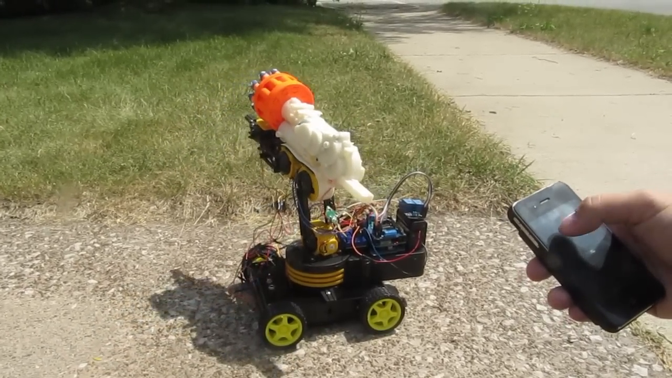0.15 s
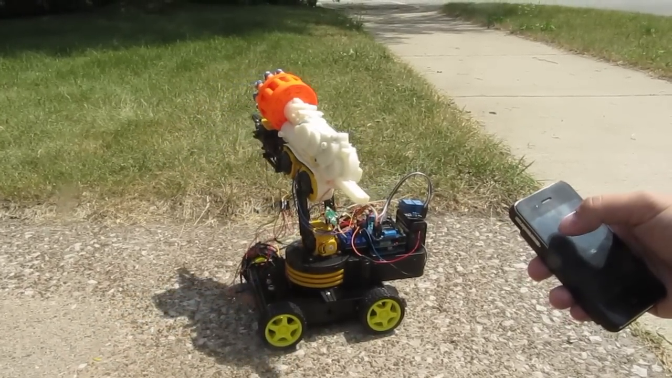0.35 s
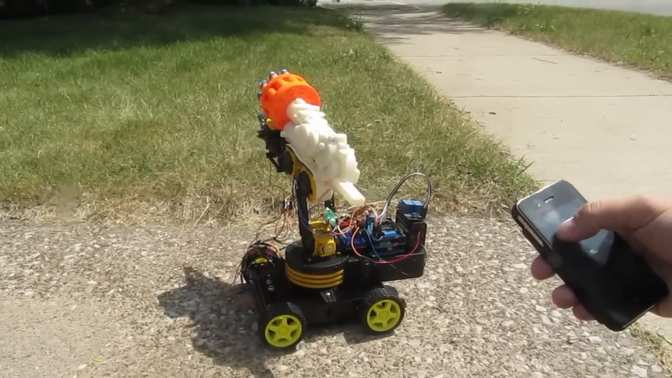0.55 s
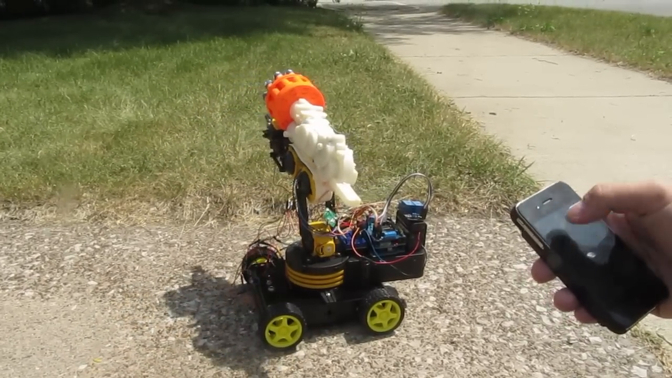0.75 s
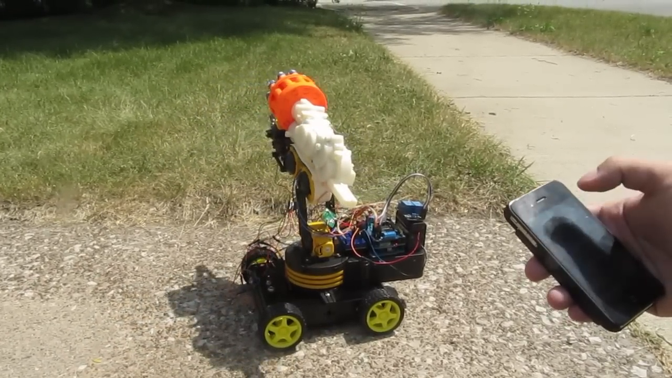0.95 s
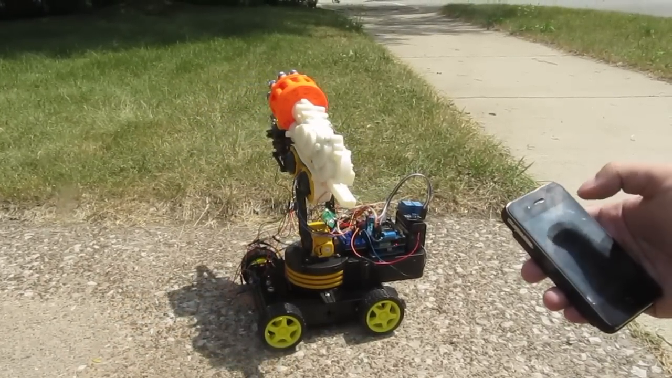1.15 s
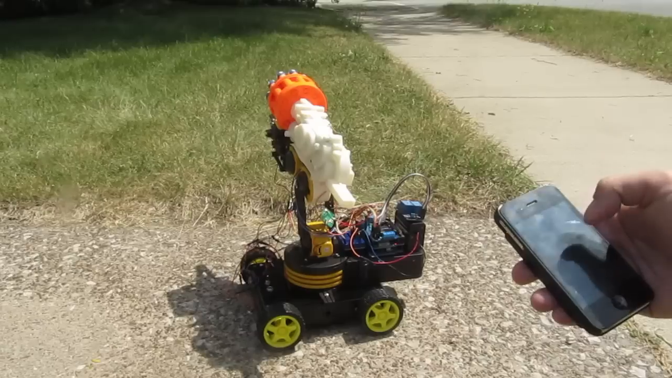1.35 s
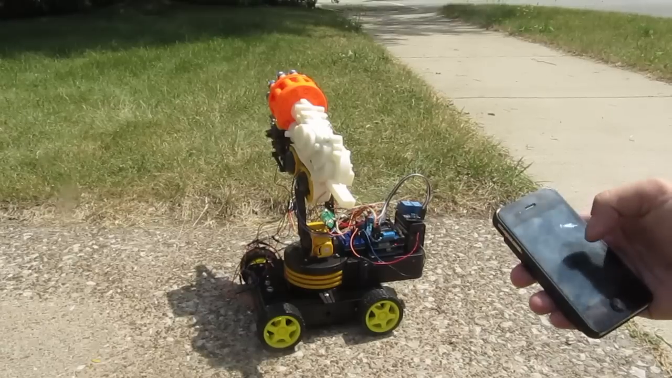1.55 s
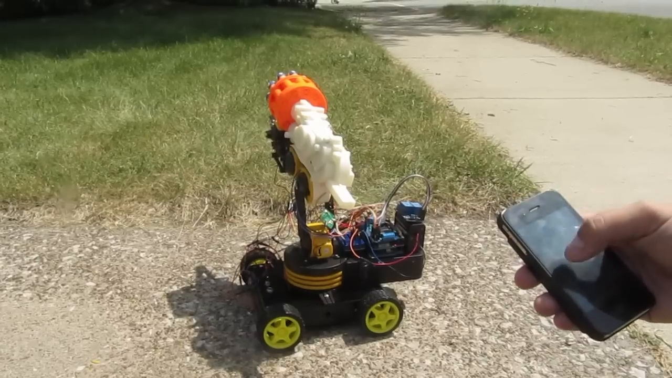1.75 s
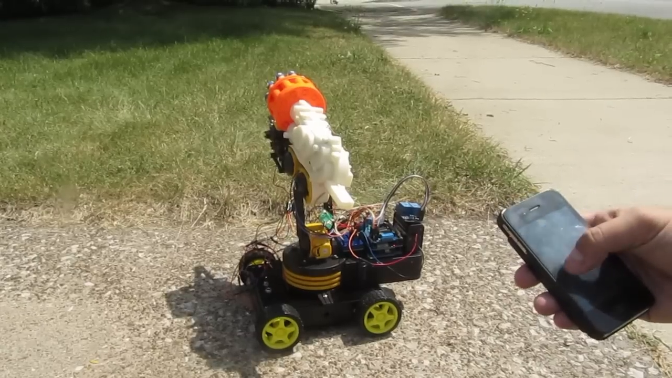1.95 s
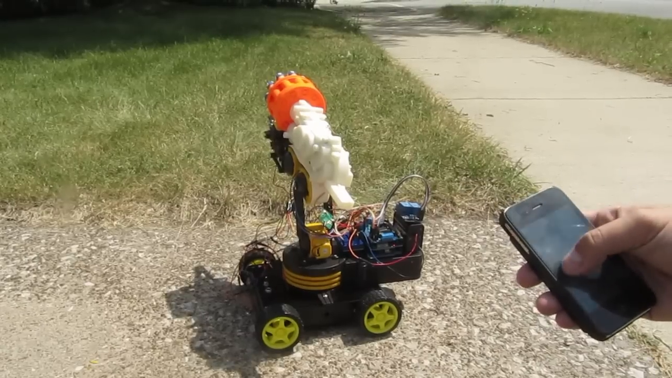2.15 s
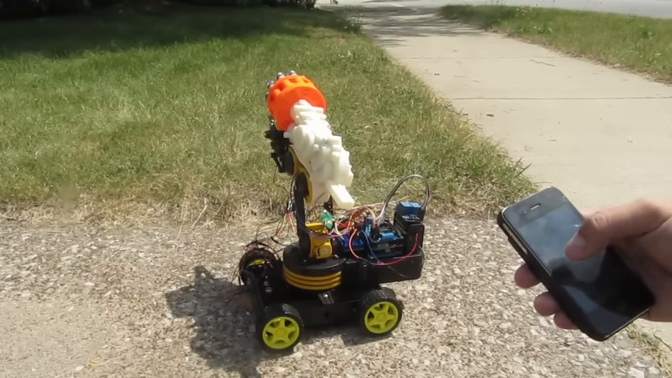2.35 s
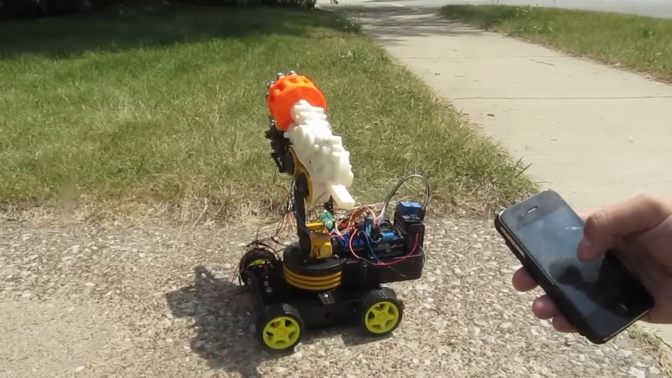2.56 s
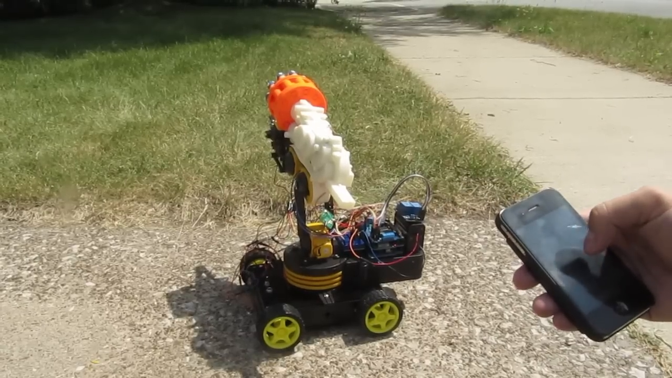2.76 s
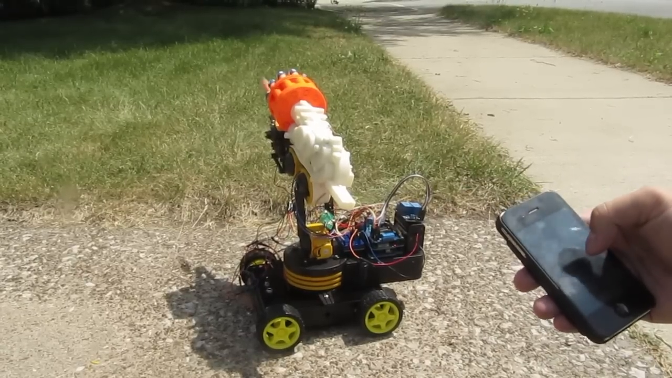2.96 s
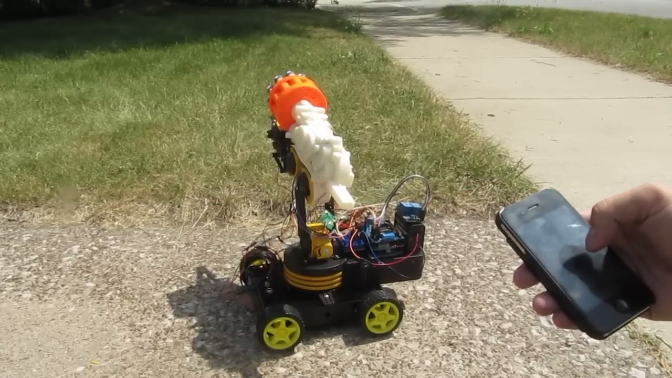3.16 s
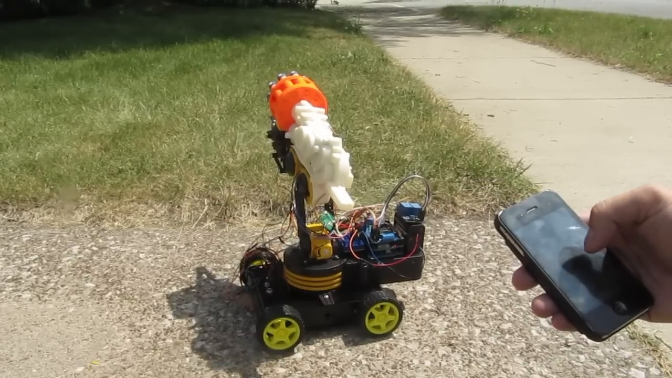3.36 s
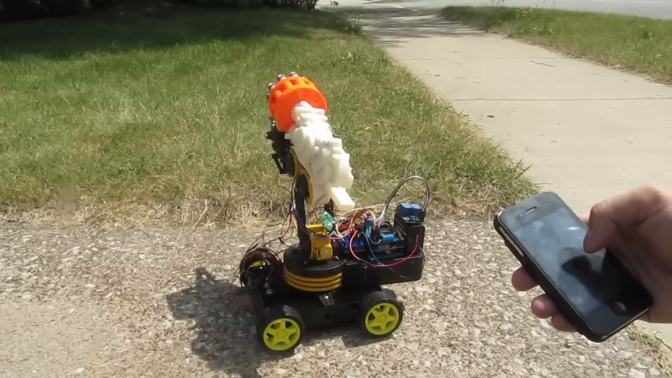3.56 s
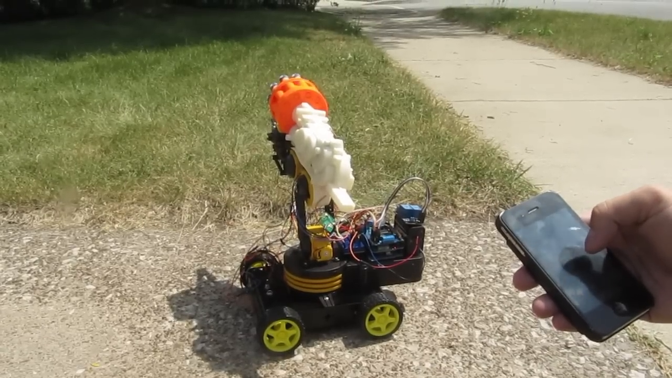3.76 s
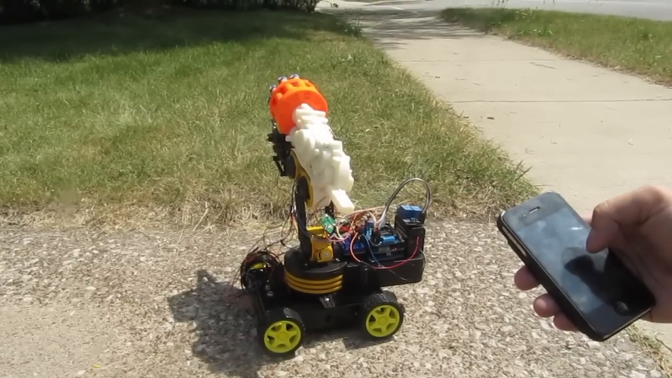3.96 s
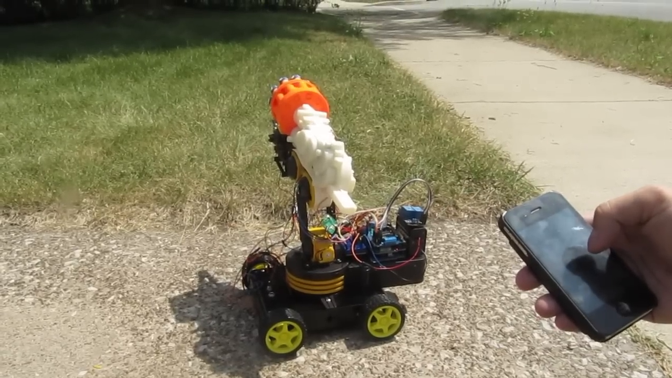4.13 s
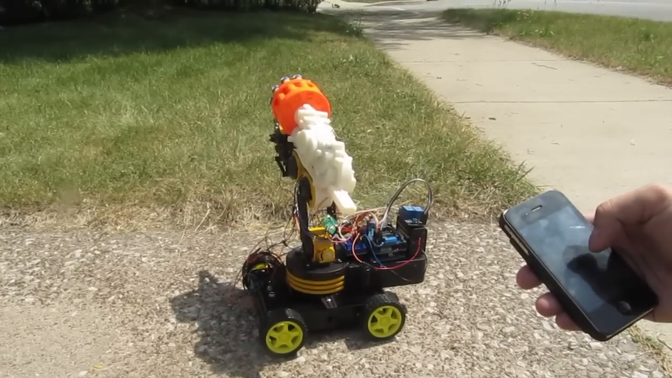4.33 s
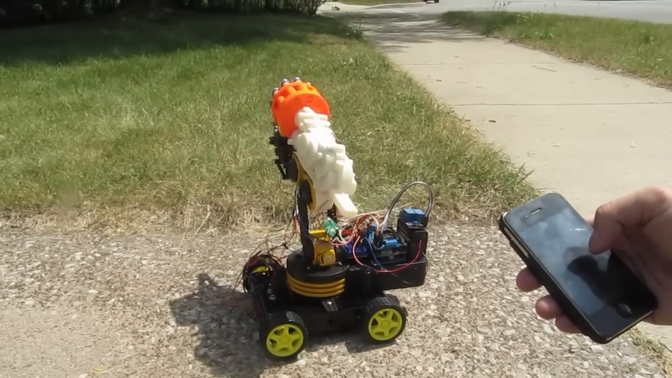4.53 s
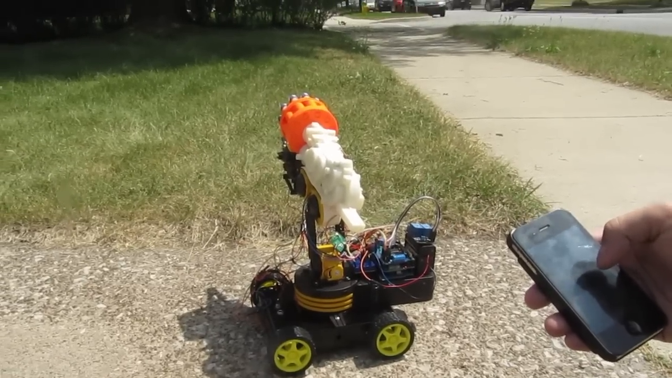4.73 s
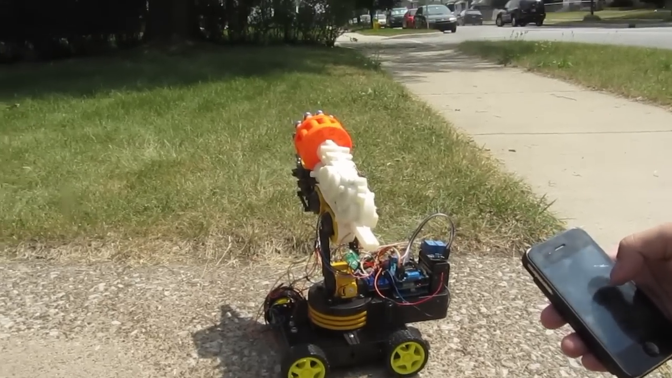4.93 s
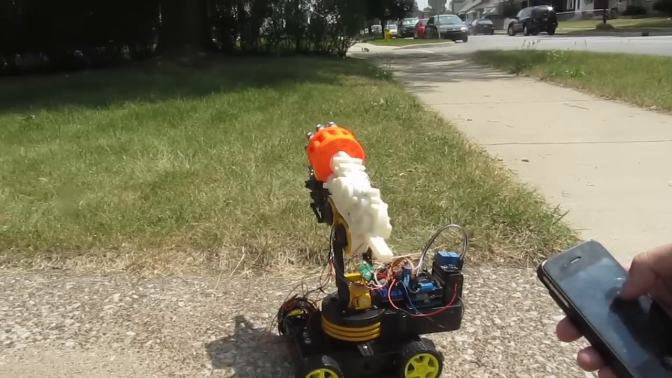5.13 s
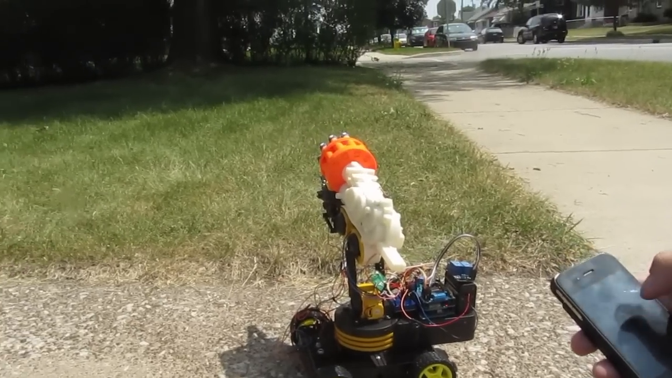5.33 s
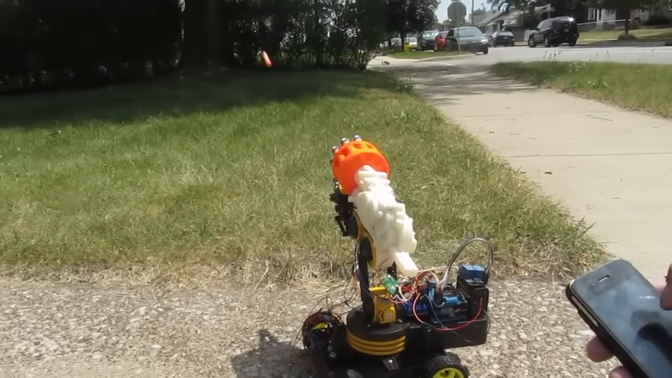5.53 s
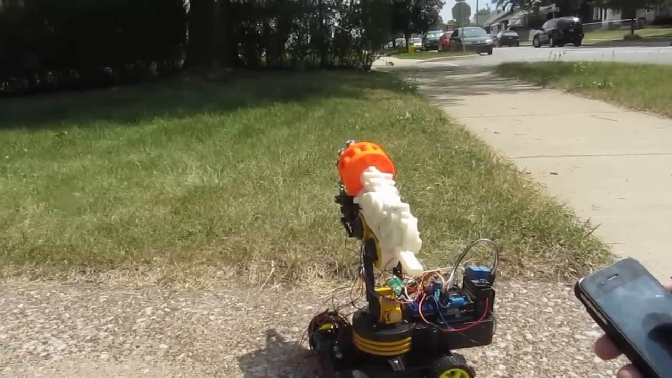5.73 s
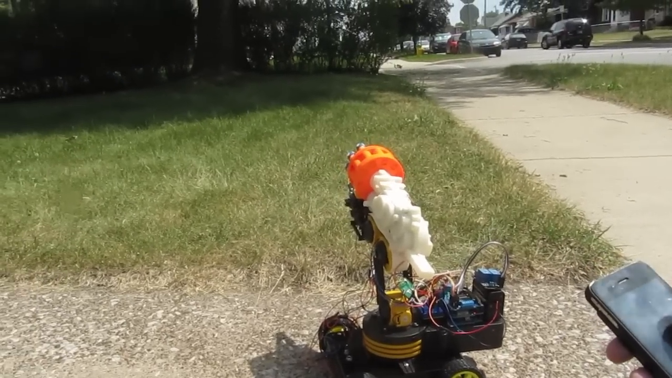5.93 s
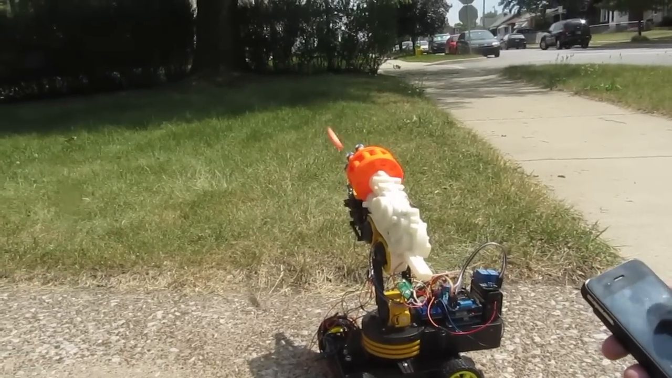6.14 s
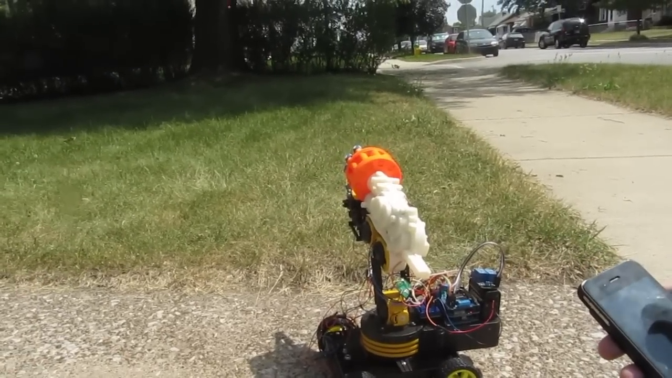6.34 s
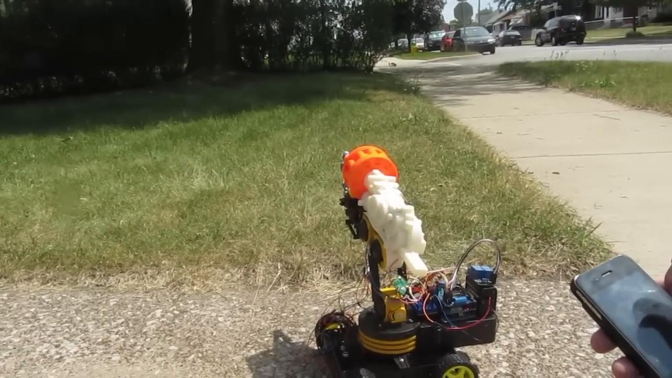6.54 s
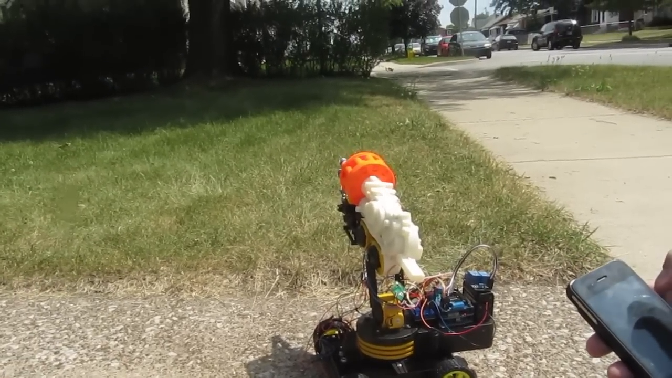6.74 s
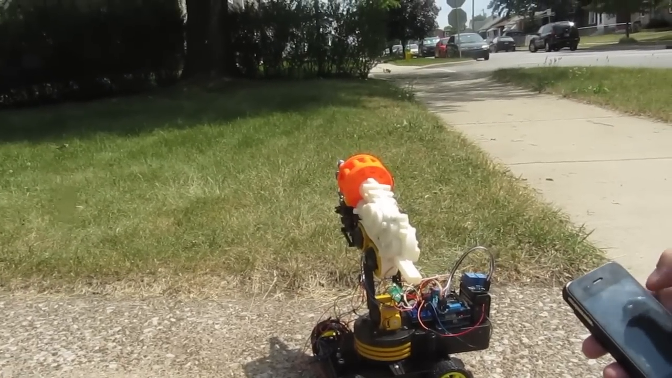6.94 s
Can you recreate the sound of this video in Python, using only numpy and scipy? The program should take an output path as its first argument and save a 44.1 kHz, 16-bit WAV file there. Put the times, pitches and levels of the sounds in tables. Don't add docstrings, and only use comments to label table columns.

```python
import sys
import numpy as np
from scipy import signal
from scipy.fft import rfft, irfft, next_fast_len
from scipy.io import wavfile
from scipy.ndimage import uniform_filter1d

SR = 44100
rng = np.random.default_rng(int(sys.argv[2]) if len(sys.argv) > 2 else 0)


def linear_from_db(decibels):
    return 10 ** (np.asarray(decibels, float) / 20)


def store_wav(level_fs):
    pcm = np.round(np.clip(np.atleast_2d(level_fs), -1, 1) * 32767)
    wavfile.write(sys.argv[1], SR, pcm.T.astype(np.int16))


N = 308259
T = np.arange(N) / SR
POWER_OFF_S = 6.14


def in_time(rows):
    s, *columns = np.transpose(rows)
    return [np.interp(T, s, c) for c in columns]


def at_hz(points, hz):
    table_hz, db = np.transpose(points)
    return np.interp(np.log(hz + 1), np.log(table_hz), db)


def resonance_db(modes, hz):
    return sum(top_db / (1 + ((hz - mode_hz) / width_hz) ** 2) for mode_hz, width_hz, top_db in modes)


def filtered(x, order, hz, kind):
    return signal.sosfilt(signal.butter(order, hz, kind, fs=SR, output="sos"), x)


def gate(start_s, end_s):
    return np.clip(np.minimum(T - start_s, end_s - T) / .005, 0, 1)


def drift(rate_hz, size=N):
    return np.interp(T[:size] * rate_hz, np.arange(400), rng.standard_normal(400)) * 1.22


def colour(x, spectrum):
    size = next_fast_len(N)
    hz = np.arange(size // 2 + 1) * SR / size
    y = irfft(rfft(x, size) * linear_from_db(at_hz(spectrum, hz)), size)[:N]
    return y / np.std(y)


def dying(start_s, t60_s, rise_s):
    age_s = np.maximum(T - start_s, 0)
    return np.minimum(age_s / rise_s, 1) * linear_from_db(-60 * age_s / t60_s)


def gritty(spread_db):
    size = np.repeat(rng.standard_normal(N // 24 + 1), 24)[:N]
    return rng.standard_normal(N) * linear_from_db(spread_db * size)


def each_turn(rows, until_s=POWER_OFF_S + .045):
    return [(shot[0] + s, *values) for shot in SHOTS[:-1] for s, *values in rows if shot[0] + s < until_s]


# (time [s], gear speed [turns/s])
SPIN_SPEED = [(2.47, 25), (2.5, 41.8), (2.55, 72.6), (2.58, 94), (2.63, 112.8), (2.7, 131), (2.77, 141.5),
              (2.84, 146), (2.92, 146), (3.03, 143.2)]
# (time after release [s], gear speed [turns/s])
CAM_SPEED = [(.09, 163), (.125, 167.8), (.2, 169.8), (.25, 167.5), (.31, 162.5), (.408, 150.2), (.575, 144),
             (.62, 143.2)]
# (time [s], gear speed [turns/s])
COAST_SPEED = [(6.17, 128.1), (6.42, 90), (6.5, 76), (6.56, 65), (6.65, 43.5), (6.71, 28.5), (6.76, 16),
               (6.82, 5)]
# (time [s], mesh line [dB], double mesh line [dB])
SPIN_LOAD = [(2.47, -63, -47), (2.52, -28, -48), (2.56, -24, -40), (2.6, -25, -38), (2.64, -38, -28.5),
             (2.75, -27, -34), (2.79, -28.5, -23), (3.03, -29, -22.5)]
# (time from release [s], mesh line [dB], double mesh line [dB])
CAM_LOAD = [(-.6, -100, -80), (-.36, -53, -49.5), (-.22, -45, -38), (-.1, -43.5, -34.5), (-.06, -44, -32),
            (-.01, -40.5, -35)]
# (time [s], mesh line [dB], double mesh line [dB])
COAST_LOAD = [(6.2, -72, -80), (6.48, -66, -75), (6.52, -45, -66), (6.59, -60, -60), (6.65, -46.5, -45),
              (6.69, -49, -58), (6.72, -60, -47), (6.76, -64, -54), (6.82, -66, -60)]
# (time [s], level [dB], treble [dB])
SPIN_GRIND = [(2.47, -17, -2), (2.476, -37, -2), (2.502, -26.5, -10), (2.58, -18, -3), (3.025, -13, 2)]
# (time after release [s], level [dB], treble [dB])
CAM_GRIND = [(.05, -17.5, 1.5), (.095, -23.5, -2.5), (.15, -11, 2), (.18, -20.5, -3), (.195, -12, 1.5),
             (.45, -15, 0.5), (.615, -16.5, 2)]
# (time [s], level [dB], treble [dB])
COAST_GRIND = [(6.245, -21, 2), (6.337, -23.5, -5), (6.421, -18, 1.5), (6.482, -30, -3),
               (6.489, -19.5, -0.5), (6.735, -26, -14), (6.775, -43, -6.5), (6.82, -66.5, 6)]
# (frequency [Hz], level [dB])
GRIND_BODY = [(290, -53), (500, -27.5), (670, -21), (822, -5), (1170, -5.5), (1410, -8.5), (1590, -4.5),
              (1870, -5.5), (2460, -1), (2810, -2.5), (4230, -1), (6560, -9.5), (7710, -3), (15600, -26),
              (16500, -63.5)]
# (frequency [Hz], width [Hz], lift [dB])
HOUSING = [(872, 63, 17), (1560, 78, 0.5), (2300, 94, 6), (2950, 40, -0.5), (4200, 180, 2.5)]
COMMUTATOR_DB = [-21.5, -16.5, -20, -15, -18]
SIDEBAND_DB = {1: [-6, 0, -4, -14], 2: [-12, 0, -4, -17], 3: [-40, -15, -40, -40]}
COMMUTATOR, MESH, OUTPUT, IDLER = 5, 24, 7.2, 26.4
BATTERY_SAG_PER_S = .7
COAST_DB, SLOW_RIPPLE_DB, SLOW_GROWL_DB = -5, -20, 10


def launcher_grit(turns, angle, level_db, treble_db):
    throb = 1 + 0.037 * np.cos(COMMUTATOR / 2 * angle)
    grit = colour(gritty(spread_db=2.0) * throb, GRIND_BODY)
    treble = filtered(grit, 2, 5500, "high")
    growl = filtered(grit, 2, [1400, 2600], "band")
    growl *= linear_from_db(SLOW_GROWL_DB * np.clip(1 - turns / 140, 0, 1)) - 1
    return linear_from_db(level_db - 2.0 + 0.65 * drift(40)) * (grit + (linear_from_db(treble_db) - 1) * treble + growl)


def launcher_lines(turns, level_db):
    before_release = [(shot[0] + s, *dbs) for shot in SHOTS[1:] for s, *dbs in CAM_LOAD]
    mesh_db, double_db = in_time(SPIN_LOAD + before_release + COAST_LOAD)
    cut_db = COAST_DB * gate(POWER_OFF_S, 9)
    drive_db = level_db + cut_db
    slow_db = SLOW_RIPPLE_DB * np.clip(1 - turns / 115, 0, 1)
    lines = [(COMMUTATOR * k, drive_db + db + slow_db / 2) for k, db in enumerate(COMMUTATOR_DB, 1)]
    lines += [(OUTPUT, double_db - 18), (IDLER, drive_db - 16.5)]
    for times, steps in SIDEBAND_DB.items():
        base_db = mesh_db if times == 1 else double_db
        for j, db in enumerate(steps, -1):
            side_db = base_db + db + (1 + abs(j)) * cut_db + abs(j) * slow_db
            lines.append((MESH * times + COMMUTATOR * j, side_db))
    return lines


def launcher():
    loaded = [(s, turns - BATTERY_SAG_PER_S * (s - SHOTS[0][0]))
              for s, turns in each_turn(CAM_SPEED, POWER_OFF_S)]
    turns, = in_time(SPIN_SPEED + loaded + COAST_SPEED)
    angle = 2 * np.pi * np.cumsum(turns) / SR
    level_db, treble_db = in_time(SPIN_GRIND + each_turn(CAM_GRIND) + COAST_GRIND)
    level_db = level_db + gain_db()
    out = launcher_grit(turns, angle, level_db, treble_db)
    for k, db in launcher_lines(turns, level_db):
        hz = k * turns
        bass_cut = 1 / (1 + (650 / hz) ** 8)
        rough_db = 1.5 if k == MESH or k > 40 else 3.2
        level = linear_from_db(db + resonance_db(HOUSING, hz) + rough_db * drift(25))
        out += bass_cut * level * np.sin(k * angle + min(.2 * rough_db, .45) * drift(55))
    return out * gate(SPIN_GRIND[0][0], COAST_GRIND[-1][0])


# (time [s], peak [dB], treble [dB], rebound delay [s], rebound [dB])
SHOTS = [
    (3.035, 4.5, -2, 0.012, -20),
    (3.663, 0, 1, 0.011, -6),
    (4.29, -2, 1, 0.009, -2.5),
    (4.922, 1, -1.5, 0.01, -7),
    (5.553, -1.5, -0.5, 0.0089, -2),
    (6.194, -1, 0.5, 0.0082, -2),
]
# (frequency [Hz], level [dB])
SHOT_BODY = [(59, -57.5), (100, -14.5), (589, -14.5), (1240, -7.5), (2080, -11.5), (2360, -5.5), (3120, -3),
             (3860, 3), (4780, -8.5), (5430, -2), (7330, -9), (10100, -4), (14500, -23), (15500, -24),
             (16500, -52)]
SHOT_T60_S, REBOUND_T60_S, RATTLE_T60_S = .06, .042, .25


def plunger():
    burst, out = colour(gritty(spread_db=2.5), SHOT_BODY), 0
    treble = filtered(burst, 2, 7000, "high")
    for s, peak_db, treble_db, delay_s, rebound_db in SHOTS:
        crack = dying(s, SHOT_T60_S, .002) + dying(s + .0013, .012, .0004)
        rebound = linear_from_db(rebound_db) * dying(s + delay_s, REBOUND_T60_S, 0.00035)
        rattle = linear_from_db(-29.5) * dying(s, RATTLE_T60_S, 0.0026)
        bright_burst = burst + (linear_from_db(treble_db + 5.0) - 1) * treble
        out = out + linear_from_db(peak_db - 13) * (crack + rebound + rattle) * bright_burst
    return out


# (time [s], level [dB], upper housing mode [dB], mode frequency [Hz])
ARM = [(0.0, -27, 3, 4100), (0.1, -27.5, 5.5, 4280), (0.27, -25.5, 5, 4000), (0.4, -25.5, 8, 4380),
       (0.576, -23.5, 3, 4100), (0.6, -27.5, 1, 4680), (0.9, -25.5, 3.5, 4650)]
# (time [s], level [dB])
ARM_COAST = [(0.94, -24.5), (1.0, -30.5), (1.08, -36), (1.17, -43), (1.25, -45), (1.33, -53), (1.45, -55)]
# (time [s], shaft speed [turns/s])
ARM_SPEED = [(0.0, 184.8), (0.16, 185.5), (0.24, 184.0), (0.37, 183.8), (0.64, 187.4), (0.92, 187.1)]
# (frequency [Hz], level [dB])
ARM_BODY = [(450, -26.5), (1950, -29.5), (2250, -17.5), (2550, -14.5), (3000, -5), (3550, 1), (3750, -10),
            (4350, -7.5), (5100, -12.5), (5900, -25.5), (6600, -13.5), (9000, -21), (12500, -29),
            (16000, -47)]
# (frequency [Hz], width [Hz], lift [dB])
ARM_MODES = [(6700, 420, -3.5), (9140, 270, 11), (11200, 200, 5)]
# (time [s], peak [dB], ring [Hz])
ARM_STOP = [(0.947, -19, 3520), (0.9756, -20.5, 3360), (1.041, -20, 3360), (1.082, -22.5, 3520),
            (1.1, -24, 3360), (1.1433, -39, 3500), (1.1733, -39, 4210), (1.2261, -37, 4080),
            (1.2386, -40, 4610), (1.293, -37, 3270)]
ARM_POLE_DB, ARM_MESH_DB, ARM_DRIFT_DB = 10, 6, 4
ARM_REPEAT = .8


def arm_lines(upper_db, upper_hz, size):
    turns = in_time(ARM_SPEED)[0][:size]
    angle, lines = 2 * np.pi * np.cumsum(turns) / SR, 0
    for k, start in enumerate(rng.normal(0, 1.4, 84), 1):
        hz = k * turns
        line_db = at_hz(ARM_BODY, hz) + ARM_POLE_DB * (k in (3, 6, 9)) + ARM_MESH_DB * (k in (12, 60))
        line_db += upper_db[:size] / (1 + ((hz - upper_hz[:size]) / 250) ** 2)
        line_db += resonance_db(ARM_MODES, hz)
        waver = drift(10, size=size) + .5 * drift(35, size=size)
        line_db += ARM_DRIFT_DB * min(k / 14, 1, 28 / k) * waver
        lines = lines + linear_from_db(line_db) * np.cos(k * angle + start + .5 * drift(13.9, size=size))
    return lines / np.sqrt(uniform_filter1d(lines ** 2, size=4000))


def arm():
    _, upper_db, upper_hz = in_time(ARM)
    level_db, = in_time([row[:2] for row in ARM] + ARM_COAST)
    repeat = ARM_REPEAT * gate(-1, .915)
    lumps = linear_from_db((1 + 2 * (T > .93)) * drift(55))
    out = np.sqrt(1 - repeat) * colour(gritty(spread_db=3.0), ARM_BODY) * lumps
    out[:SR] += np.sqrt(repeat[:SR]) * arm_lines(upper_db, upper_hz, SR)
    out *= linear_from_db(level_db) * gate(-1, ARM_COAST[-1][0])
    for s, peak_db, hz in ARM_STOP:
        ring = np.sin(2 * np.pi * hz * T + 1.1 * drift(53.3)) + 0.2 * np.sin(2 * np.pi * 2300 * T)
        out += linear_from_db(peak_db + 2.0) * dying(s, 0.033, 0.00097) * ring
    return out


# (time [s], peak [dB], ring [Hz], broad part [dB])
TICKS = [
    (1.8632, -43, 8600, -7),
    (2.4625, -8, 10060, -9),
    (5.0599, -38, 8800, -11),
    (6.3149, -46, 8750, 0),
    (6.3949, -48, 8550, -2),
    (6.495, -33, 9000, 2),
]
# (time [s], peak [dB], ring [Hz], broad part [dB])
KNOCKS = [
    (2.4684, -19, 2290, -12),
    (2.507, -13, 2270, -29),
    (2.7024, -6, 2500, -16),
    (2.7634, -13, 3420, -1),
    (6.14, -27, 3990, -9),
    (6.8847, -36.5, 3130, -4.5),
    (6.8996, -51, 3140, -3),
]
# (time [s], peak [dB])
CAM_TICKS = [(3.493, -19), (4.1047, -20), (4.7337, -20), (5.3612, -20), (5.9963, -21)]
# peak [dB], ring [Hz], broad part [dB]
BOUNCE = (-33, 6500, 0)
# peak [dB], ring [Hz], broad part [dB]
PAWL = (-37, 9300, 4)
BOUNCE_S, PAWL_S = .0345, .192
CAM_TICK_HZ, CAM_TICK_BROAD_DB, TICK_SPREAD = 9600, 2, .04


def ticks():
    bright = filtered(rng.standard_normal(N), 3, [1800, 11000], "band")
    again = [(shot[0] + BOUNCE_S, *BOUNCE) for shot in SHOTS] + each_turn([(PAWL_S, *PAWL)])
    again += [(s, db, CAM_TICK_HZ, CAM_TICK_BROAD_DB) for s, db in CAM_TICKS]
    again = [(s, db, hz * (1 + TICK_SPREAD * rng.normal()), broad_db) for s, db, hz, broad_db in again]
    out = 0
    for s, peak_db, hz, broad_db in TICKS + KNOCKS + again:
        body = .4 * np.sin(2 * np.pi * hz * T) + linear_from_db(broad_db - 3) * bright
        out = out + linear_from_db(peak_db + 6) * dying(s - .0005, 0.014, 0.00038) * body
    return out


# (time [s], length [s], start [Hz], end [Hz], level [dB])
BIRDS = [(1.17, 0.032, 4400, 4000, -49.5), (1.23, 0.048, 4700, 4600, -45.5),
         (1.285, 0.058, 3430, 3200, -50.5), (1.51, 0.06, 4800, 3750, -55), (1.59, 0.02, 7330, 5900, -64),
         (1.84, 0.017, 3130, 3800, -51.5), (1.854, 0.026, 4900, 3960, -46.5),
         (1.87, 0.041, 3700, 3100, -53), (2.005, 0.024, 5500, 5240, -54), (1.993, 0.041, 3800, 2594, -57),
         (2.048, 0.041, 5500, 5450, -64), (2.068, .022, 3870, 4950, -55), (2.09, 0.038, 4440, 3840, -57),
         (1.95, 0.049, 4350, 4200, -57), (2.131, 0.035, 4400, 4000, -55), (2.332, 0.026, 3950, 3100, -56),
         (2.302, 0.015, 3700, 4150, -55), (2.364, 0.032, 2800, 3550, -54.5),
         (2.388, 0.043, 4200, 3850, -65), (2.397, 0.068, 3500, 3080, -63),
         (6.813, 0.055, 5100, 2560, -69.5), (1.878, 0.025, 2800, 2950, -55),
         (6.921, 0.012, 3900, 4550, -67), (6.931, 0.023, 4530, 4480, -72), (6.953, 0.016, 5070, 2970, -66)]


def birds():
    out = np.zeros(N)
    for s, length_s, start_hz, end_hz, db in BIRDS:
        part = np.arange(round(length_s * SR)) / (length_s * SR)
        hz = start_hz + (end_hz - start_hz) * part ** 0.68
        note = np.sin(np.pi * part) ** 0.085 * np.sin(2 * np.pi * np.cumsum(hz) / SR)
        at = round(s * SR)
        out[at:at + len(part)] += linear_from_db(db + 10.0) * note
    hoarse = .6 + 2 * signal.lfilter([.06], [1, -.94], rng.standard_normal(N))
    out *= linear_from_db(2.5 * drift(57)) * hoarse
    echo = rng.standard_normal(N) * dying(0.0036, 0.21, 0.011)
    return out + linear_from_db(-29.5) * signal.fftconvolve(out, echo[:SR // 4])[:N]


# (frequency [Hz], level [dB])
STREET = [(15, -35), (30, -12), (70, -6), (120, 0), (200, -7), (400, -16.5), (750, -20.5), (1200, -22),
          (2100, -28.5), (3500, -30), (8000, -38.5), (12000, -44.5), (16500, -72)]
# (time [s], width [s], lift [dB])
RUMBLES = [
    (4.75, 0.11, 1),
    (5.35, 0.3, 2),
]
# (time [s], peak [dB])
WIND = [
    (1.849, -22.5),
]
STREET_LEVEL_DB = -42


def street():
    swell_db = sum(db * np.exp(-((T - s) / width_s) ** 2) for s, width_s, db in RUMBLES)
    level_db = STREET_LEVEL_DB + gain_db() + swell_db + 2 + 0.43 * drift(7.1)
    out = linear_from_db(level_db) * colour(rng.standard_normal(N), STREET)
    (s, peak_db), = WIND
    return out + linear_from_db(peak_db) * dying(s - .01, 0.13, 0.01) * np.sin(2 * np.pi * 45 * T)


SINK_DB_PER_S, DUCK_DB, RECOVER_DB_PER_S, DUCK_S = 20, -26, 13.5, 0.024


def gain_db():
    out = -SINK_DB_PER_S * np.maximum(T - SPIN_SPEED[0][0], 0)
    for shot in SHOTS:
        out = np.where(T > shot[0], DUCK_DB + RECOVER_DB_PER_S * (T - shot[0]), out)
    late = np.append(np.zeros(int(DUCK_S * SR / 2)), out)[:N]
    return uniform_filter1d(late, int(DUCK_S * SR), mode="nearest")


def scene():
    return (launcher() + plunger() + arm() + ticks() + birds() + street())[None]


def band_limit(x):
    return signal.sosfilt(signal.butter(12, 16810, fs=SR, output="sos"), x)


def record(dry):
    top_cut = signal.cheby2(10, 60, 16900, fs=SR, output="sos")
    mix = signal.sosfilt(top_cut, .85 * np.tanh(dry / 0.83))
    return band_limit(mix)


dry = scene()
out = record(dry)
store_wav(out)
```